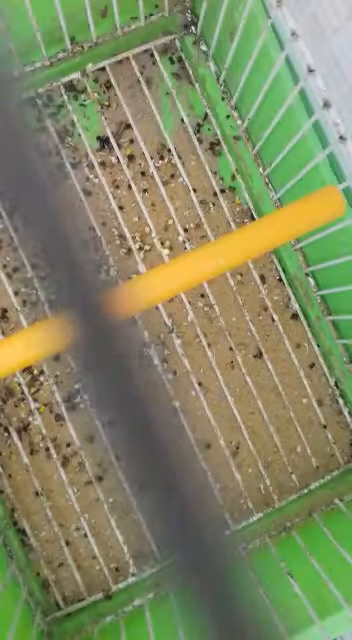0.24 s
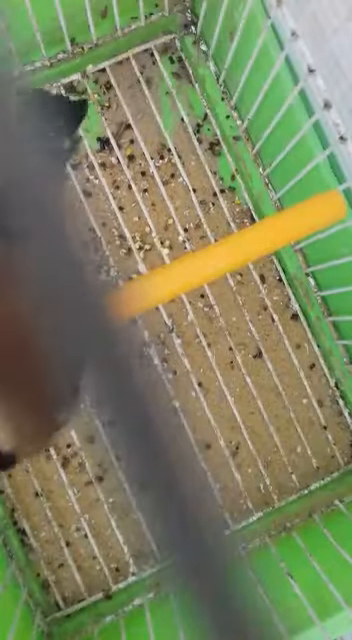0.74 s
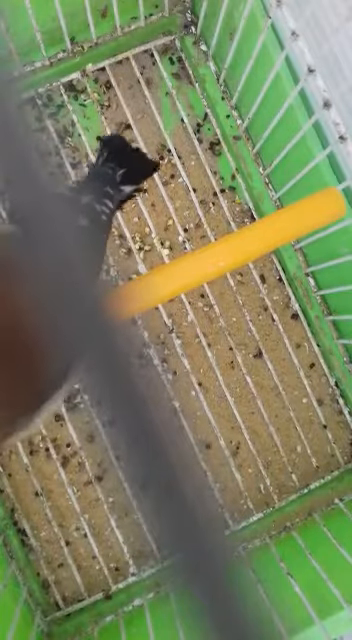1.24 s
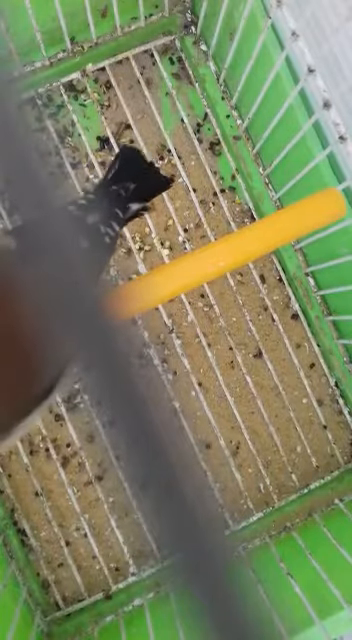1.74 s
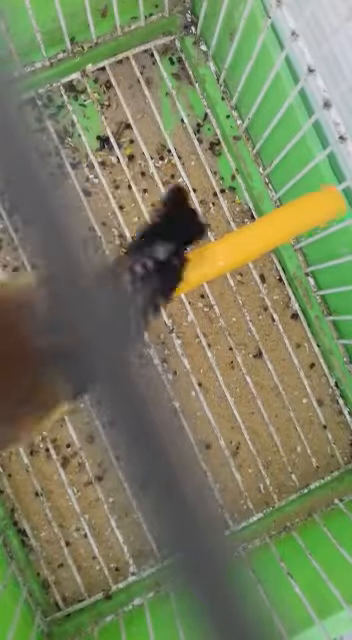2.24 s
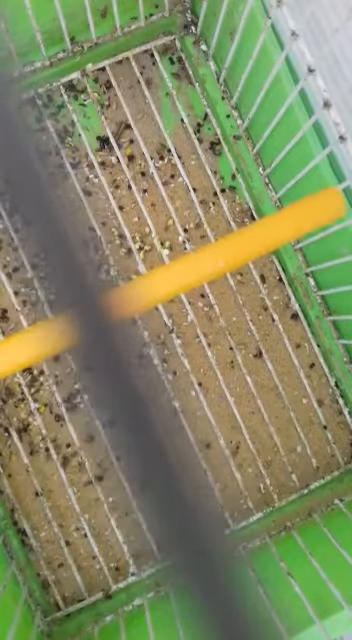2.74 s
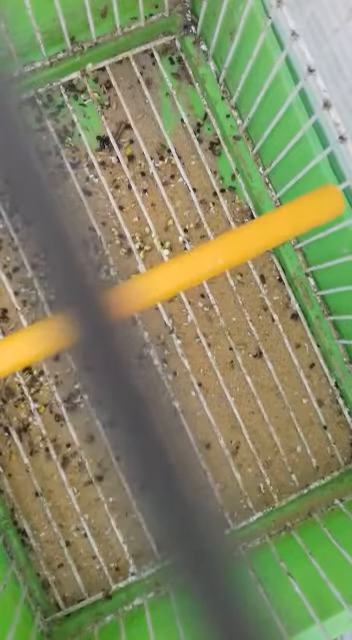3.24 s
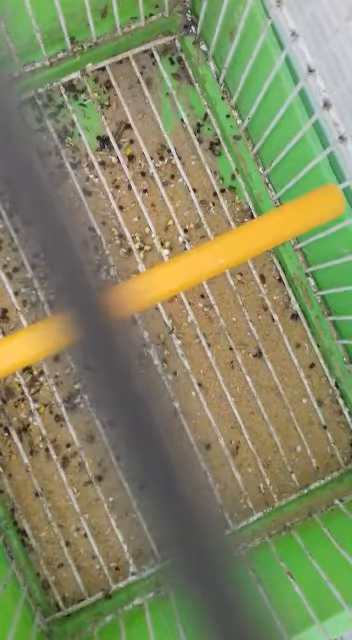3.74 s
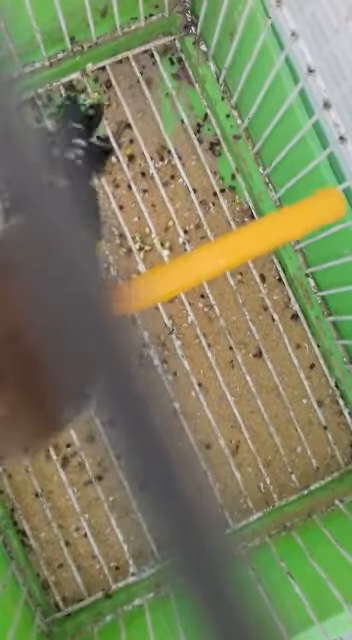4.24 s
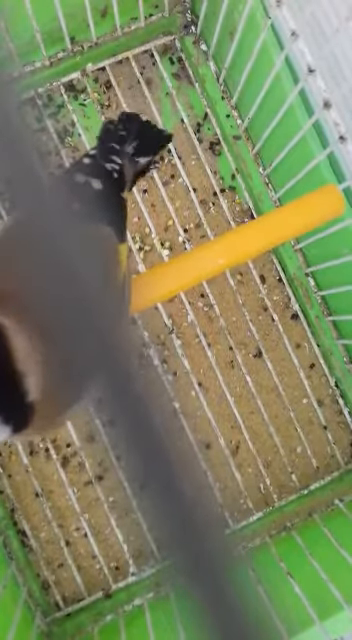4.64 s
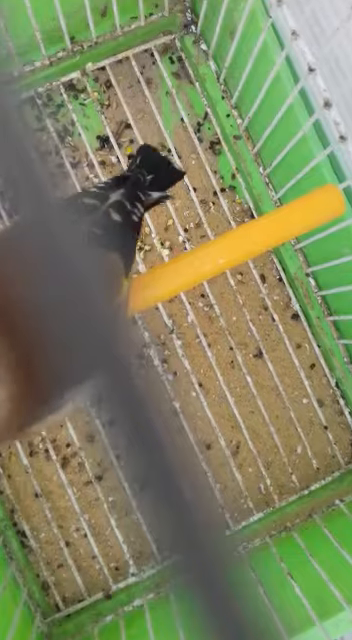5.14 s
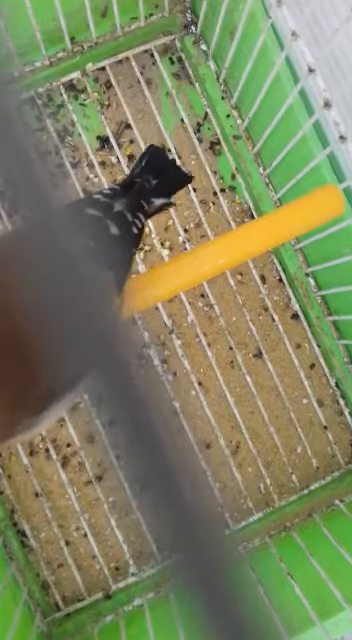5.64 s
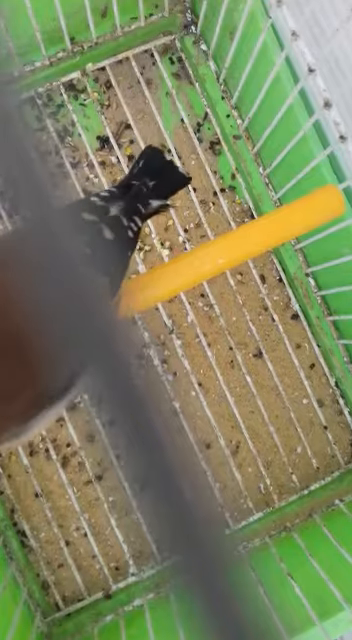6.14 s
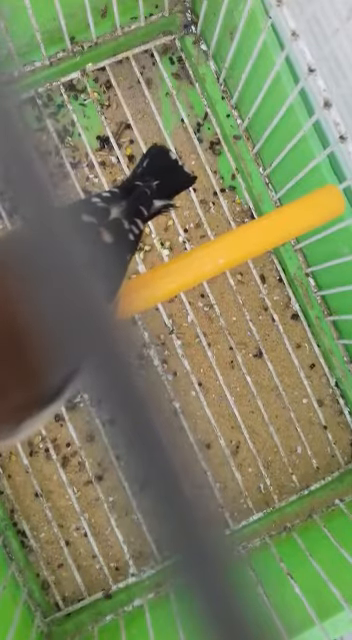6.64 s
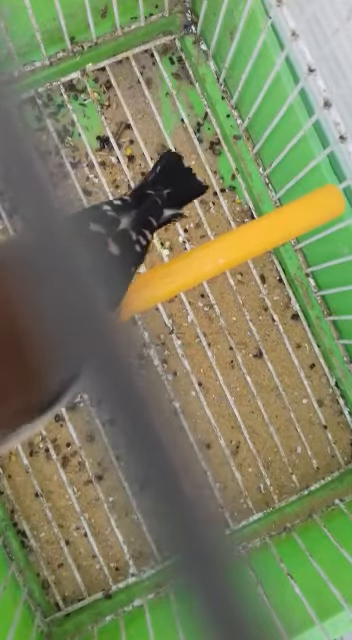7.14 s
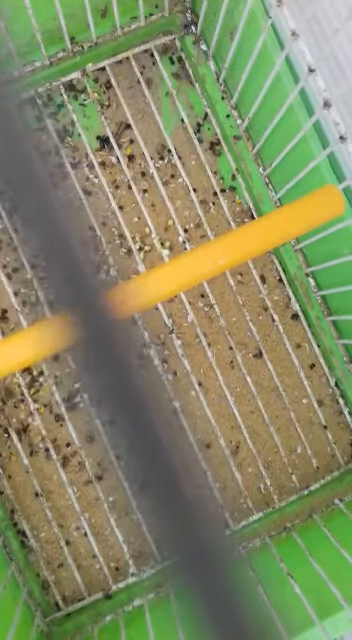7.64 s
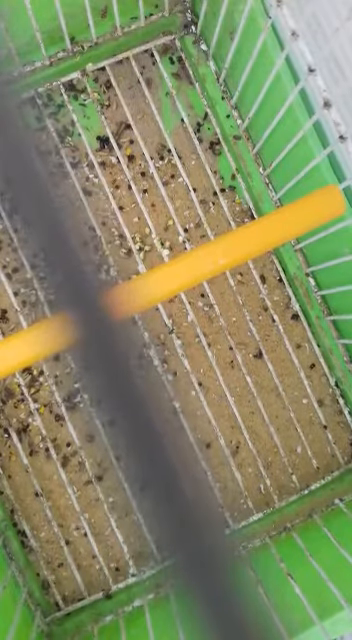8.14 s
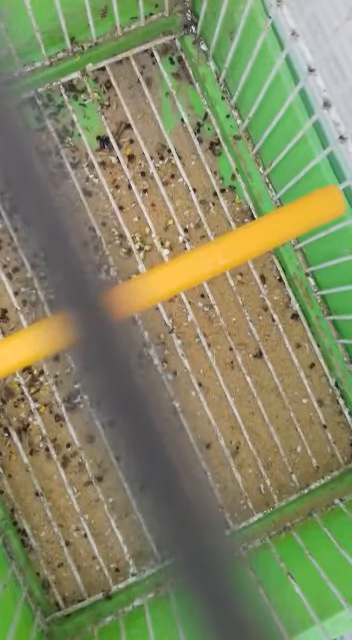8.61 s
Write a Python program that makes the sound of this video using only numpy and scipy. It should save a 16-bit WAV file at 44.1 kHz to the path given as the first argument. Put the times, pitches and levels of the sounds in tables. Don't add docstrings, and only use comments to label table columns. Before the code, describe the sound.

Close to a phone microphone indoors, a finch hops lightly on cage wires, then sings a rapid high twitter of chirps, whips and buzzy rising notes. Feet tick, rattle and thump in the pause before a second similar phrase ends on a high flourish. More soft hopping follows and a dish clinks further off. Very faint distant birds, a low engine drone early on, and soft mains hum lie behind.

```python
import sys
import numpy as np
from scipy import signal
from scipy.fft import rfft, irfft, next_fast_len
from scipy.io import wavfile
from scipy.ndimage import uniform_filter1d

SR = 44100
rng = np.random.default_rng(int(sys.argv[2]) if len(sys.argv) > 2 else 0)


def int16_out(signal):
    q = np.round(np.clip(np.atleast_2d(signal).T, -1, 1) * 32767)
    wavfile.write(sys.argv[1], SR, q.astype(np.int16))


def voltage_ratio(level):
    return 10 ** (np.asarray(level, float) / 20)


N = 391166

# after its start [t/s],
# pitch [f/Hz], loudness [level/dB]
CHIP = [
    [(0, 2677, -35.5), (.0044, 3120, -10.5), (.0094, 3432, -5), (.0135, 3540, -10.5), (.017, 3600, -11),
     (.0204, 3650, -16.5), (.0244, 3800, -39)],
]
BLIP = [
    [(0, 3250, -48), (.0045, 3270, -24), (.0095, 3520, -44)],
]
WHIP = [
    [(0, 1450, -38), (.004, 1900, -28), (.0084, 3000, -10), (.0118, 3330, -5.5), (.016, 3560, -9.5),
     (.021, 3600, -17), (.026, 3580, -45)],
]
PEEP = [
    [(0, 4700, -42), (.0055, 5220, -16), (.012, 5600, -14.5), (.021, 6200, -45)],
]
THIN = [
    [(0, 6200, -50), (.01, 6400, -27), (.024, 6800, -48)],
    [(0, 6900, -46), (.009, 7800, -30), (.022, 8850, -50)],
]
SWELL = [
    [(-.001, 2394, -33), (.01, 2610, -17), (.017, 2760, -14.5), (.0285, 3000, -4.5), (.036, 3056, -3),
     (.046, 3050, -10), (.0519, 3100, -30)],
]
DOUBLE = [
    [(0, 3160, -38.5), (.004, 3200, -17), (.009, 3460, -8), (.016, 3950, -24)],
    [(.0035, 4300, -41), (.009, 4500, -23), (.0194, 4830, -9), (.025, 5000, -17), (.034, 5750, -45)],
]
HOOK = [
    [(0, 2880, -42), (.0052, 3400, -3), (.008, 3900, -14), (.0115, 4220, -18), (.016, 4330, -11),
     (.023, 4400, -7), (.028, 4450, -12), (.031, 4650, -25), (.038, 5050, -36)],
]
CLIMB = [
    [(-.001, 2430, -32), (.0115, 2900, -11.5), (.016, 2940, -12), (.0235, 2980, -20), (.0329, 3250, -4),
     (.0375, 3460, -.5), (.043, 3570, -3), (.0465, 3650, -14), (.0534, 3830, -28)],
]
DRAWL = [
    [(0, 4870, -44), (.021, 5150, -22), (.031, 5480, -17.5), (.044, 5800, -29), (.062, 6100, -51)],
    [(.002, 6250, -46), (.017, 6650, -28), (.028, 6830, -19), (.037, 6950, -19), (.047, 7200, -30),
     (.064, 7600, -40)],
]
FLAT = [
    [(-.001, 2680, -38), (.008, 2880, -10.5), (.014, 2975, -8), (.021, 3050, -13), (.024, 3050, -38)],
]
TWO_STEP = [
    [(0, 2950, -38), (.0063, 3450, -4.5), (.0085, 4150, -14), (.0108, 4400, -8), (.0132, 4700, -15),
     (.016, 4950, -11), (.0205, 5250, -19), (.027, 5600, -38)],
    [(.0205, 3400, -36), (.0248, 3500, -10.5), (.0275, 3950, -16), (.03, 4120, -10.5), (.034, 4250, -9),
     (.0395, 4400, -7), (.044, 4600, -14), (.0504, 5000, -36)],
]
FORK = [
    [(.0005, 2860, -34), (.006, 3260, -6.5), (.0098, 3570, -3), (.0165, 3850, -12), (.0243, 3870, -24)],
    [(.0225, 3100, -30), (.0268, 3400, -4), (.029, 4000, -12.5), (.0305, 4300, -8), (.032, 4550, -11),
     (.0355, 4950, -8.5), (.046, 5450, -17), (.062, 5850, -36)],
    [(.033, 3700, -30), (.038, 4200, -24), (.041, 4650, -17.5), (.047, 4820, -15.5), (.068, 5050, -43)],
]
FALL = [
    [(0, 9350, -36), (.012, 8950, -33), (.032, 7600, -30), (.046, 6900, -23), (.0533, 6790, -19.5),
     (.063, 7050, -42)],
    [(.0007, 6800, -44), (.0234, 5900, -41.5), (.033, 5680, -35), (.0457, 5600, -29.5), (.0527, 5500, -45)],
]
CLOSE = [
    [(0, 4720, -39), (.005, 4900, -17), (.0098, 5080, -6.5), (.0148, 5280, -21), (.018, 5400, -30)],
    [(.0165, 3500, -36), (.019, 4600, -26), (.0225, 5440, -8), (.027, 5850, -12), (.03, 6020, -18.5),
     (.0374, 6140, -18), (.0649, 6320, -38)],
]
TWIN = [
    [(0, 6150, -44), (.009, 6380, -33), (.02, 6750, -46)],
    [(0, 7250, -44), (.009, 7650, -36), (.019, 8150, -44)],
]
FLICK = [
    [(0, 3250, -42), (.004, 3200, -26), (.0068, 3600, -30), (.011, 5000, -43)],
]
UNDER = [
    [(-.001, 2400, -38), (.008, 2850, -28), (.013, 2980, -21), (.018, 3250, -22), (.0235, 3200, -32)],
]


def evened(x):
    return x / np.sqrt(np.mean(x ** 2) + 1e-20)


def coloured(x, points):
    hz, db = np.transpose(points)
    size = next_fast_len(len(x))
    bins = np.fft.rfftfreq(size, 1 / SR)
    gain = voltage_ratio(np.interp(np.log(bins + 1), np.log(hz), db))
    return irfft(rfft(x, size) * gain, size)[:len(x)]


def add(mix, s, sound):
    part = mix[round(s * SR):][:len(sound)]
    part += sound[:len(part)]


def smooth_columns(rows):
    s, hz, db, *rest = np.transpose(rows)
    t = np.arange(s[0], s[-1], 1 / SR)
    columns = [hz, voltage_ratio(db / 2), *rest]
    hz, root, *rest = (uniform_filter1d(np.interp(t, s, c), size=70, mode="nearest") for c in columns)
    return hz, 2 * 20 * np.log10(root), *rest


def membrane(hz, db):
    ends = signal.windows.tukey(len(hz), min(1, 130 / len(hz)))
    return voltage_ratio(db) * ends * np.exp(2j * np.pi * np.cumsum(hz) / SR)


def finch():
    arrow, power = sung_voices()
    shape = arrow / np.sqrt(power)
    beat = abs(shape) ** 2 - 1
    flutter = evened(signal.lfilter(*signal.butter(2, 1500, fs=SR), rng.standard_normal(N)))
    duet = uniform_filter1d(beat ** 2, size=200)
    sharp_beat = beat ** 2 - duet

    apart = uniform_filter1d(coloured(beat, [(400, -30), (1100, 0)]) ** 2, size=200)
    arrow = arrow * np.exp(.3j * apart * evened(uniform_filter1d(flutter, size=40)))
    squeeze = coloured(beat + .5 * sharp_beat, [(250, -22), (550, 0)])
    squeeze = squeeze + voltage_ratio(-27) * (1 + 5 * apart) * flutter

    throat = [(700, -55), (1500, -25), (3500, -7.5), (5500, -14.5), (7500, -30), (10000, -32)]
    breath = voltage_ratio(-34) * power ** 0.09 * rng.standard_normal(N)
    pressed = np.sqrt(power) * (0.87 * beat + .4 * sharp_beat)
    sides = coloured(arrow.real * squeeze + pressed + breath, throat)

    beak = [(5200, -28), (6100, -39), (8500, -41), (11000, -37), (15000, -41)]
    bend = (1 + 2.5 * duet + 5.5 * apart) * shape + 0.4 * shape ** 2 + .12 * shape ** 3 + .12 * shape ** 4
    overtones = (power + 1e-5) ** -.3 * arrow * bend
    log_power = np.log(uniform_filter1d(power, size=200) + 1e-6)
    swelling = uniform_filter1d(np.gradient(log_power) * SR, size=100)
    richness = .35 + 1.3 * apart + np.clip(swelling / 300, 0, 1.2)
    overtones *= (1 + .12 * flutter) * richness
    bright = coloured(overtones.real + 5 * duet * breath, beak)
    return 1.05 * arrow.real + sides + voltage_ratio(-11.5) * bright


def sung_voices():
    # [t/s], lower pitch [f/Hz], [level/dB], gap up to the other voice [f/Hz],
    # upper voice against the lower [level/dB]
    duets = [
        [(1.0598, 2580, -41.5, 256.3, -5), (1.068, 2910, -21, 245, -3), (1.077, 3300, -8.5, 190, -1.5),
         (1.084, 3650, -8, 145, 0), (1.092, 4000, -9.5, 100, -5), (1.1, 4340, -17.5, 80, -12),
         (1.108, 4406, -28.5, 61.3, -7)],
        [(5.658, 1386, -46, 50, -41.5), (5.672, 3279, -9.5, 49.14, -41), (5.682, 3620, -26, 49.17, -42),
         (5.701, 3950, -4.5, 200, -36), (5.706, 4140, -8.5, 190, -20), (5.711, 4120, -12.5, 210, -.8),
         (5.7205, 4100, -13.5, 235, -1.5), (5.728, 4050, -17.5, 660, -1.5), (5.76, 4420, -40, 880, -2.5)],
    ]
    voices = [(rows[0][0], membrane(*smooth_columns(rows))) for rows in sung_strokes()]
    for rows in duets:
        hz, db, gap_hz, upper_db = smooth_columns(rows)
        voices.append((rows[0][0], membrane(hz, db)))
        voices.append((rows[0][0], membrane(hz + gap_hz, db + upper_db)))
    arrow, power = np.zeros(N, complex), np.full(N, 1e-12)
    for s, voice in voices:
        add(arrow, s, voice)
        add(power, s, abs(voice) ** 2)
    return arrow, power


def sung_strokes():
    # syllable, start [t/s], louder by [level/dB], pitch [ratio], length [ratio]
    first_phrase = [ (CHIP, .7044, -6.5, .87, .95), (CHIP, .8317, -.8, 1.001, 1.001),
                    (TWIN, .8865, -.6, 1.001, 1.02), (FLICK, .934, .2, 1.001, 1.001),
                    (WHIP, .935, .2, 1.004, 1.001), (PEEP, .9913, -2.5, 1.005, 1.1),
                    (PEEP, 1.0132, -1.5, .97, 1.35), (BLIP, 1.031, -5.5, .91, 1.15),
                    (TWIN, 1.1185, 3.5, .965, 1.1), (SWELL, 1.2153, .2, .999, 1.001),
                    (PEEP, 1.3031, 1.2, .995, 1.01), (BLIP, 1.316, -9.5, 1.55, 1.25),
                    (FLICK, 1.349, -5.5, .98, .9), (WHIP, 1.35, -.2, .99, 1.02),
                    (DOUBLE, 1.3954, .2, .999, 1.02), (HOOK, 1.4729, .6, .99, 1.02),
                    (CLIMB, 1.5293, .2, 1.001, 1.001), (HOOK, 1.6102, -.6, 1.005, .92),
                    (DRAWL, 1.672, 1.2, .995, 1.03), (FLAT, 1.7857, -1.8, .995, 1.001),
                    (TWO_STEP, 1.8241, .8, 1.002, .995), (UNDER, 1.895, -.2, .995, 1.04),
                    (UNDER, 2.0265, -8.5, .99, .8), (FORK, 1.895, -.2, .995, 1.04),
                    (THIN, 1.978, 1.2, 1.01, 1.001), (FORK, 2.0265, -1.2, .998, .98)]
    second_phrase = [ (DRAWL, 4.511, -11, 1.03, .8), (SWELL, 4.737, -2.2, 1.015, .97),
                     (PEEP, 4.8297, -1.2, 1.01, .9), (BLIP, 4.845, -17.5, 1.58, 1.05),
                     (FLICK, 4.8736, 3.8, 1.005, .9), (WHIP, 4.8758, .2, 1.001, .96),
                     (DOUBLE, 4.9235, .2, 1.008, .97), (HOOK, 5.0009, -1.2, 1.002, 1.03),
                     (CLIMB, 5.0557, .6, .99, .99), (HOOK, 5.1134, .6, .998, .94),
                     (DRAWL, 5.176, -1.2, 1.008, .92), (FLAT, 5.2712, 1.8, 1.012, .99),
                     (TWO_STEP, 5.3109, 1.4, .998, 1.005), (UNDER, 5.3822, -4.5, .99, .8),
                     (UNDER, 5.5119, -7.5, .99, .8), (FORK, 5.3822, 1.2, .999, 1.03),
                     (THIN, 5.463, -.2, 1.002, 1.02), (FORK, 5.5119, .6, 1.012, .99),
                     (THIN, 5.6142, -1.2, .96, 1.05), (FLICK, 5.6581, 3.8, 1.002, 1.001),
                     (FALL, 5.8043, 0, 1, 1), (CLOSE, 5.8706, 0, 1, 1)]
    strokes = []
    for syllable, s, db, pitch, length in first_phrase + second_phrase:
        for stroke in syllable:
            strokes.append(np.array(stroke) * [length, pitch, 1] + [s, 0, db])
    return strokes


def cage():
    # [t/s], claw tick [level/dB], wire rattle against the tick [level/dB]
    hops = [(0.2894, -62, 18.5), (0.3394, -75, 24), (0.6194, -58.5, 6), (0.7058, -44, 8.5),
            (0.7831, -55, 6.5), (2.4849, -66, 14), (2.5085, -57, 9), (2.6334, -54, 7), (2.6444, -54.5, -5),
            (4.0302, -48, 10), (4.0397, -50.5, 8), (4.0771, -52.5, 7), (4.1445, -55, 9.5),
            (4.1812, -42.5, 2), (4.1879, -46, 5), (4.2187, -55, 7.5), (4.2557, -50.5, -16),
            (4.2951, -59, 12), (6.2514, -60, 7), (7.35, -70, 19), (7.3964, -68, 20), (7.457, -66, 14),
            (7.4869, -68, 18), (7.5508, -66, 12), (7.5916, -54, 11), (7.69, -59, 9), (8.008, -60, 8),
            (8.742, -54, 3), (8.8382, -47, 10)]
    # [t/s], [level/dB]
    thumps = [
        (2.43, -44),
        (4.046, -39),
        (4.38, -43),
        (5.232, -39),
        (7.405, -42),
        (7.43, -43),
        (8.845, -40),
    ]
    # [f/Hz], [level/dB]
    claw_colour = [(1200, -20.5), (2500, -3.5), (4000, 8), (10000, -12), (15500, -12)]
    wire_colour = [(700, -13), (1200, -3.5), (1800, -6.5), (2020, -2), (2250, -5), (2600, -1), (3700, -8.5),
                   (5000, -34)]
    perch_colour = [(90, -23.5), (150, -12.5), (440, -0.5), (520, -2), (610, -2.5), (900, -39.5)]
    tick, rattle, thump = np.zeros((3, N))
    t = np.arange(SR // 3) / SR
    thud = voltage_ratio(-60 * t / .16) * np.minimum(t / 0.003, 1)
    for s, db, rattle_db in hops:
        add(tick, s, voltage_ratio(db - 60 * t / 0.051))
        add(rattle, s, voltage_ratio(db + rattle_db - 60 * t / 0.26) * np.minimum(t / 0.0076, 1))
        add(thump, s, voltage_ratio(db + 5.5) * thud)
    for s, db in thumps:
        add(thump, s, voltage_ratio(db) * thud)
    grain_db = 1.9 * np.repeat(rng.exponential(1, N // 40 + 1), 40)[:N]
    grains = rng.standard_normal((3, N)) * voltage_ratio(grain_db)
    parts = zip((tick, rattle, thump), grains, (claw_colour, wire_colour, perch_colour))
    return sum(envelope * evened(coloured(grain, colour)) for envelope, grain, colour in parts)


def knocks():
    wire_modes = [(1233, -8), (1970, 0), (2460, -2.5)]
    landings = [
        (2.652, -36.5),
        (7.604, -41),
    ]
    out, t = np.zeros(N), np.arange(SR // 5) / SR
    ring = sum(voltage_ratio(db - 60 * t / .13) * np.sin(2 * np.pi * hz * t) for hz, db in wire_modes)
    ring *= np.minimum(t / .005, 1)
    buzz = evened(uniform_filter1d(rng.standard_normal(len(t)), size=150))
    ring *= voltage_ratio(-60 * t / .3) * (1 + .5 * buzz)
    for s, db in landings:
        add(out, s, voltage_ratio(db) * ring)
    return out


def clink():
    dish_modes = [(800, -6, .15), (894, -6, .4), (991, 0, .3), (1078, -2, .45), (1109, 0, .5),
                  (1249, -10, .4), (2083, -7, .25), (2223, -6, .6), (2428, -9, .4), (2627, -10, .4),
                  (2745, -4, .5), (2955, 0, .15), (3022, -5, .5), (3058, 0, .75)]
    start_s, level_db = 8.461, -35.5
    out, t = np.zeros(N), np.arange(SR // 2) / SR
    ring = sum(voltage_ratio(db - 60 * t / t60) * np.sin(2 * np.pi * hz * t) for hz, db, t60 in dish_modes)
    ring *= 1 + .4 * evened(uniform_filter1d(rng.standard_normal(len(t)), size=500))
    crack = voltage_ratio(13 - 60 * t / 0.3) * rng.standard_normal(len(t))
    add(out, start_s, voltage_ratio(level_db) * (ring + crack))
    return coloured(out, [(400, -12), (750, -4), (3200, -8.5), (4500, -45), (8000, -44)])


def far_birds():
    # [t/s], length [t/s], pitch from [f/Hz], pitch to [f/Hz], [level/dB], trill rate [f/Hz]
    calls = [(2.742, .02, 2800, 3200, -58, 5), (2.846, .022, 2970, 3440, -55.5, 5),
             (3.39, .175, 3300, 3080, -60, 60), (2.355, .095, 2750, 3000, -58, 33),
             (2.425, .025, 4100, 4250, -70, 5), (3.195, .04, 4200, 3950, -71, 5),
             (4.62, .22, 650, 655, -58, .3), (7.348, .05, 3350, 3250, -60, 4),
             (4.335, .05, 3200, 3000, -58, 4), (4.05, .38, 608, 598, -57, .3),
             (5.1, .14, 695, 700, -52, .3), (5.11, .06, 1400, 1500, -55, .3)]
    out = np.zeros(N)
    for s, length, from_hz, to_hz, db, trill in calls:
        t = np.arange(0, length, 1 / SR)
        tone = membrane(from_hz + (to_hz - from_hz) * t / length, db).real
        add(out, s, tone * np.sin(np.pi * t / length) ** .3 * abs(np.cos(np.pi * trill * t)) ** 4)
    return out


def rumble():
    level_db = np.interp(np.arange(N) / SR, [0, 2.1, 2.8], [-58, -58, -75])
    drone = coloured(rng.standard_normal(N), [(60, -24.5), (95, 9), (122, 8), (150, -36)])
    return voltage_ratio(level_db) * evened(drone)


def air():
    air_colour = [(20, -46), (60, -15), (105, -9.5), (160, -11.5), (580, -16), (1040, -7.5), (2000, -22.5),
                  (3300, -30), (4700, -47), (9000, -45.5), (13000, -46.5)]
    hum_db = [-62, -57, -54.5, -53.5, -70]
    hum_hz, air_db = 99.87, -47
    turns = hum_hz * np.arange(N) / SR
    drift = [evened(uniform_filter1d(v, size=4000)) for v in rng.standard_normal((len(hum_db) + 1, N))]
    hum = np.zeros(N)
    for k, db in enumerate(hum_db):
        wave = np.cos(2 * np.pi * (k + 1) * turns + 0.62 * drift[k])
        hum += voltage_ratio(db + 2.5 + 0.75 * drift[k]) * wave
    hiss = evened(coloured(rng.standard_normal(N), air_colour))
    return voltage_ratio(air_db + .6 * drift[-1]) * hiss + hum


def room(x):
    fading = [(3000, 0.6), (6000, 0.25), (12000, 0.05)]  # [f/Hz], time to fade by 60 dB [t/s]
    taps = np.zeros(SR // 2)
    at = np.arange(260, len(taps) - 22, 22)
    taps[at + rng.integers(0, 22, len(at))] = rng.choice([-1., 1.], len(at))
    hz, t, z = signal.stft(taps, SR, nperseg=256)
    t60 = np.interp(hz, *np.transpose(fading))[:, None]
    tail = signal.istft(z * voltage_ratio(-60 * t / t60), SR, nperseg=256)[1]
    tail /= np.linalg.norm(tail)
    tail[round(.081 * SR)] += .3
    return signal.fftconvolve(x, tail)[:N]


def scene():
    tray_echoes = [
        (.0029, -25),
    ]
    lost_s = 5.0918
    bird, far, hops = finch(), clink() + far_birds(), cage() + knocks()
    wet = room(voltage_ratio(-37.5) * bird + voltage_ratio(-9) * far + voltage_ratio(-10.5) * hops)
    bird = bird + sum(voltage_ratio(db) * np.roll(bird, round(s * SR)) for s, db in tray_echoes)
    cut = round(lost_s * SR)
    cut += np.argmin(bird[cut:cut + 14]) + 1
    bird[cut:cut + SR // 50] = 0
    return (bird + wet + voltage_ratio(5) * far + hops + air() + rumble())[None]


def band_limit(x):
    return signal.sosfilt(signal.butter(12, 16290, fs=SR, output="sos"), x)


def record(dry):
    microphone = [(8300, -1), (9600, -7), (11000, -1), (15500, -1), (16000, -25.5)]  # [f/Hz], [level/dB]
    heard = coloured(dry[0], microphone)[None]
    return band_limit(heard)


dry = scene()
out = record(dry)
int16_out(out)
```